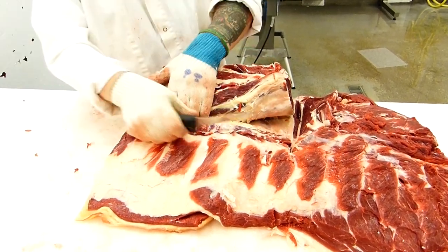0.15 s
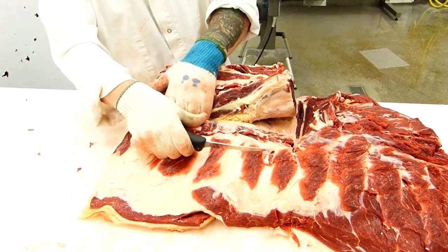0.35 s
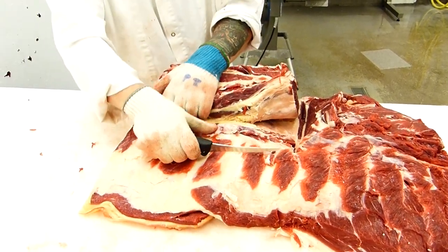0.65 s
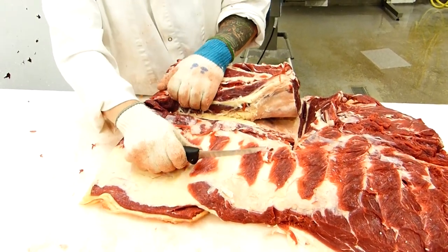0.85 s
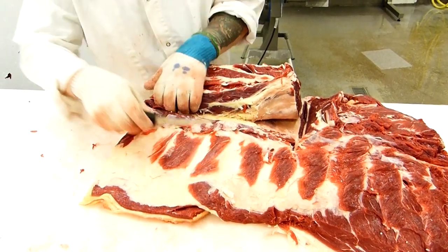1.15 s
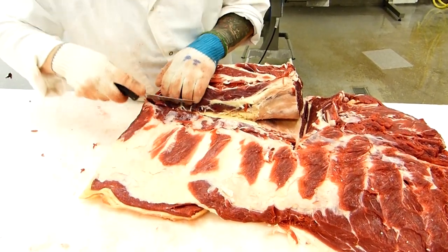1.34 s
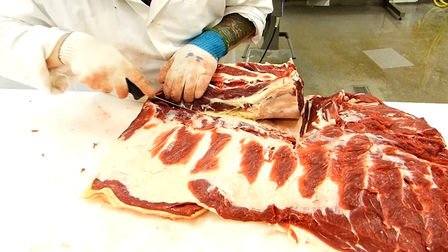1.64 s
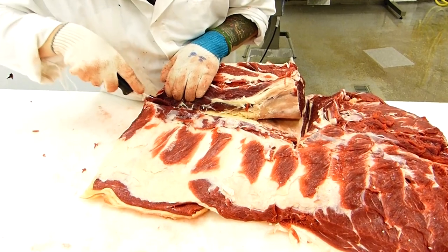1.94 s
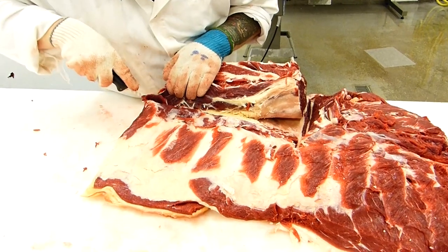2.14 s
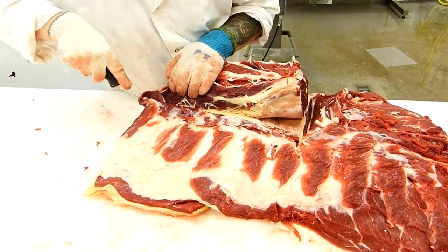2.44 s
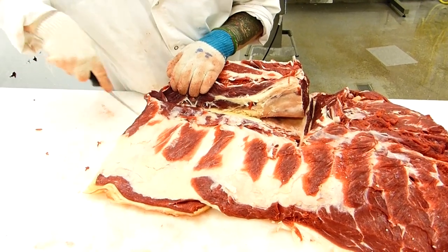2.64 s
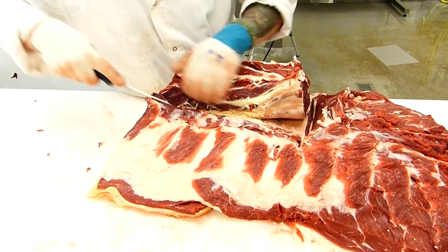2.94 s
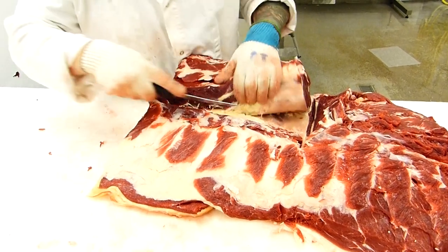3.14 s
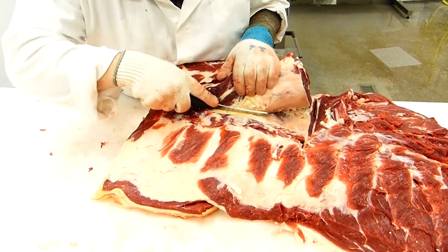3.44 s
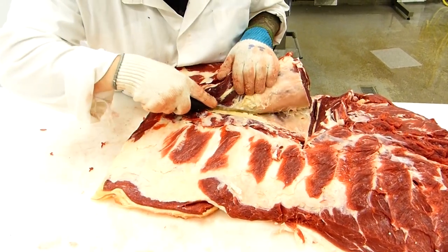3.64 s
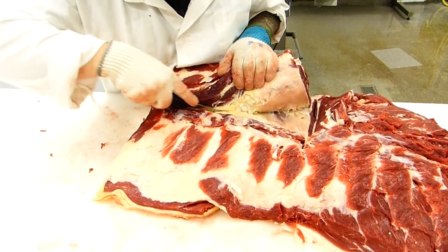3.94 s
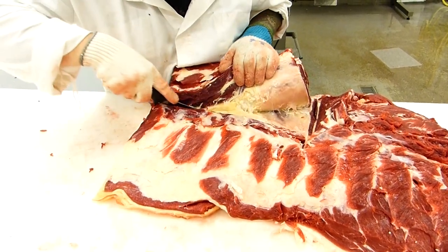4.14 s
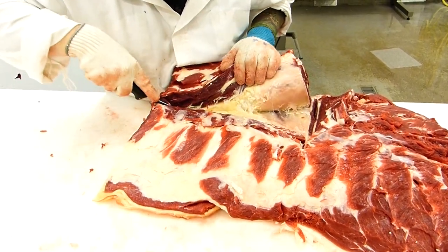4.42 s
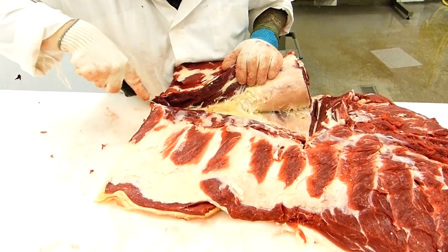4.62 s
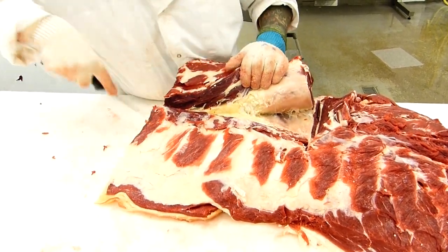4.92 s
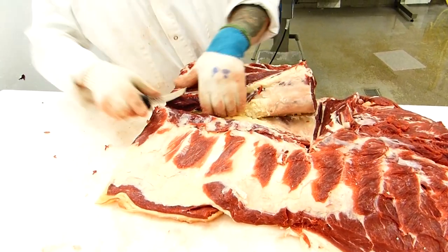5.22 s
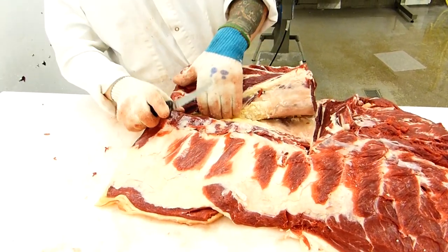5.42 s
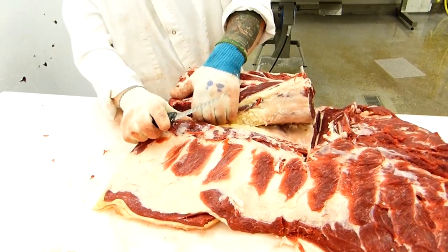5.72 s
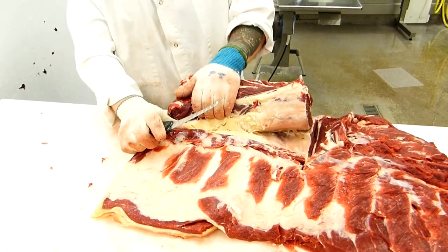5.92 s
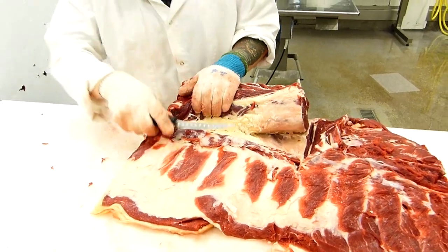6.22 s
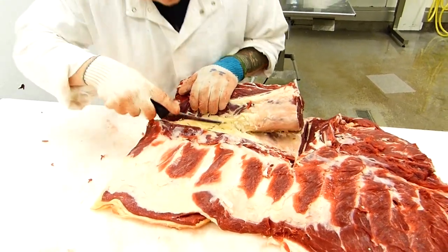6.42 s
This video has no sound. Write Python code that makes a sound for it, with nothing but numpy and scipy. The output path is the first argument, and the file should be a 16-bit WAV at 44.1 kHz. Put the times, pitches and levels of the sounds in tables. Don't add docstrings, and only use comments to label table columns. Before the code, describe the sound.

A cold, tiled cutting room hums throughout: a low wavering drone from two motors around 90 to 125 hertz, soft fan rumble, air rushing through a grille and a bright, slightly fluctuating hiss from a leaking air line, all wide in stereo. Close by, a faint bump at 0.4 s, then a few tiny clicks and a short tearing rasp with a small firm slap near 0.8. A light pat comes at 2.7. Crisp knife crackles burst at 3.1-3.4 and again around 3.85. At 4.9 a joint is slapped down, sharp, wet and very loud, with a roomy metallic tail. Soft settling and low table thuds follow at 5.0-5.4, then a faint rasp near 5.65 and the heaviest deep bump at 5.77, its low swing lingering. A faint blade drag at 6.2 and a light bump at 6.5 close it. The background dips briefly after loud touches.

```python
import sys
import numpy as np
from scipy import signal
from scipy.fft import rfft, irfft, next_fast_len
from scipy.io import wavfile
from scipy.ndimage import uniform_filter1d

SR = 44100
rng = np.random.default_rng(int(sys.argv[2]) if len(sys.argv) > 2 else 0)


def volts_from_db(level):
    exponent = np.asarray(level, float) / 20
    return 10 ** exponent


def wrap_up_sound(samples):
    columns = np.atleast_2d(samples).T
    tamed = np.clip(columns, -1, 1)
    steps = np.round(tamed * 32767).astype(np.int16)
    wavfile.write(sys.argv[1], SR, steps)


N = 289737

# f/Hz, density/dB per Hz
RUMBLE_SPECTRUM = [(6, 1), (12, -4.5), (24, 8), (35, -9.5), (54, 1), (72, -0.5), (82, -7), (108, 1),
                   (128, -13), (150, -10), (175, -11.5), (204, -17), (214, -13), (240, -26)]
RUSH_SPECTRUM = [(110, -1), (180, -2.5), (207, -4), (226, -14), (254, -8.5), (370, -9), (396, -11.5),
                 (429, -12), (450, -13.5), (582, -13.5), (1030, -11.5), (1900, -16.5), (2470, -45),
                 (4180, -120)]
GRILLE_SPECTRUM = [(1060, -34), (1800, -6), (2150, -6), (2440, -1.5), (2840, -2), (3240, -4), (3520, -4.5),
                   (3750, -5.5), (4400, -4), (5720, -15), (9680, -120)]
LEAK_SPECTRUM = [(2470, -36), (4200, -9), (5010, -6), (5630, 0), (6080, -3), (6680, 2), (7180, 0.5),
                 (8020, -1.5), (9060, 0.5), (10700, -12.5), (15700, -26.5)]
# f/Hz, width/Hz, lift/dB
DUCT_MODES = [(1044, 79, 3), (1780, 340, -6), (283, 120, -1), (2070, 50, 6.5), (2430, 150, 4),
              (2910, 37, 1.5), (3300, 81, -4), (3430, 130, 3), (4040, 60, 5.5), (4100, 59, -15),
              (4540, 53, 3.5), (3770, 670, -2), (4600, 50, -1), (5200, 55, -0.5), (6500, 59, 6),
              (6860, 120, 0), (7300, 82, 7), (9150, 150, 4), (12700, 250, 3), (13600, 120, 9),
              (15620, 150, 6)]
# f/Hz, level/dB rms, waver/dB
MOTOR_TONES = [(100.2, -36.5, 1.5), (123.3, -37.5, 0), (184, -39.5, 1.5), (200.6, -40.5, 0.6),
               (302.5, -56.5, 4), (398.7, -45, 0.5), (457.4, -51, -1.3), (548, -56, 4), (764, -53.0, 0),
               (15625, -56.5, 1.5)]
# f/Hz, left-right coherence/1, left-right level/dB, left lead/rad
MIC_PAIR = [(25, 1, 3, 0.74), (70, 0.98, 0, 0.76), (152, 0.89, 4, 0.69), (320, 0.43, 9, 0.43),
            (740, 0.46, 10, 0.37), (1800, 0.56, 8.5, -0.82), (4000, 0.57, 8.5, 0.068),
            (6500, 0.61, 4, -0.89), (7600, 0.64, 9, 0.8), (8300, -0.27, -1.5, 0.34),
            (9050, -0.46, 10, 0.25), (10800, -0.43, -3, .05), (12600, -0.81, 11, .05),
            (15500, -0.58, -5, 0.12)]
# t centre/s, width/s, lift/dB
LEANS = [(0.44, 0.079, 7.5), (0.9, 0.12, 4.5), (1.42, 0.06, 4.0), (2.32, 0.11, 4.0), (3.27, 0.074, 5.5),
         (4.4, 0.3, -0.5), (4.92, 0.038, 8), (5.09, 0.12, 9.0), (5.24, 0.07, 9.0), (5.52, 0.07, 8),
         (5.37, 0.04, 5), (6.2, 0.11, 5), (5.85, 0.21, 13.5), (6.55, 0.24, 7)]
# t centre/s, width/s, lift/dB
DRAUGHTS = [(0.24, 0.055, -9), (0.442, 0.096, -1.5), (4.87, 0.06, 6.5), (6.05, 0.12, -5)]
# t/s, pressure over mean/dB, brightness/dB
LEAK_CONTROL = [(0, 0, -1.5), (0.3, -1.5, -2), (0.65, 1.5, -0.7), (0.9, 1, 0.3), (1.1, 1.5, 0),
                (1.45, 0.5, 2.5), (1.7, -0.5, -1), (2.2, 2.2, -1.2), (2.5, 0.6, 0.3), (2.8, 0, 2.5),
                (3.1, 0.6, 0), (3.5, -0.1, 0), (4.6, -0.3, -1.1), (5.4, 2.5, 0.7), (6.1, -0.3, 0.5),
                (6.45, 0.7, 1.5), (6.57, 0, 2)]
# t/s, gain/dB
GAIN_CONTROL = [(0, -0.5), (0.4, 0.2), (0.8, 0), (1.7, 0.02), (3.15, 0.7), (3.3, -1), (3.83, -0.2),
                (3.93, -1.5), (4.85, -1.15), (4.97, 0.5), (5.35, -2.1), (5.75, -1.1), (5.85, -1), (6.1, -3),
                (6.45, -1.1), (6.57, -0.2)]
# t/s, top level/dB, frame level/dB
TABLE_BUMPS = [
    (.41, -35, -24),
    (5.214, -9, -34),
    (5.35, -12, -40),
    (5.6, -14.5, -41),
    (5.764, -6.5, -2),
    (5.782, -0.5, -35),
    (6.5, -22, -14),
]
# t/s, peak/dB, f/Hz
FIBRE_SNAPS = [(.679, -15, 2400), (.731, -17, 2600), (3.133, -10, 4000), (3.129, -14, 4000),
               (3.153, -8, 4500), (3.1605, -8, 4500), (3.1865, 1.5, 6200), (3.1865, -11, 3000),
               (3.2267, -6, 9000), (3.2342, -3, 7500), (3.2835, -15, 3500), (3.380, -23, 4000),
               (3.4012, -4, 6500), (3.445, -13, 6500), (3.8313, -6, 6000), (3.833, -8, 5500),
               (3.8395, -17, 5000), (3.8455, -8, 3300), (3.8563, -5, 3300), (3.857, -7, 3000),
               (3.85, -8, 5500), (3.861, -10, 4000), (3.8594, -7, 4500), (4.8986, -4, 3200),
               (4.901, -13, 2200), (4.9155, -7, 3800), (4.9152, -9, 8500), (5.648, -13, 3000)]
# t start/s, length/s, level/dB, f centre/Hz, click rate/(1/s)
BLADE_TEARS = [(0.765, 0.08, -35, 1500, 2600), (0.77, 0.087, -33, 600, 2000),
               (0.764, 0.086, -31.5, 4000, 3400), (3.13, 0.045, -33, 5000, 2300),
               (3.186, 0.052, -27, 4000, 3400), (3.82, 0.049, -24, 4180, 2700),
               (3.854, 0.010, -27, 2600, 5000), (3.84, 0.03, -36, 900, 3000), (4.98, 0.22, -35, 650, 900),
               (4.888, 0.012, -22, 5200, 6000), (5.617, 0.11, -43, 2500, 3300),
               (5.706, 0.088, -44, 416, 1400), (5.16, 0.07, -37, 350, 1800),
               (6.22, 0.16, -40.5, 1180, 3600)]
# t/s, peak/dB, body f/Hz, t60/s, room tail/dB
MEAT_SLAPS = [
    (.793, -10, 258, 0.017, -36),
    (2.689, -17, 446, 0.022, -43),
    (4.9153, 9, 490, 0.0064, -17),
    (5.04, -17, 334, 0.045, -34.5),
    (5.185, -21, 250, 0.11, -40),
    (5.222, -17, 140, 0.15, -50),
    (5.72, -22, 330, 0.04, -53),
    (5.752, -22, 456, 0.05, -44),
]
# f/Hz, width/Hz, level/dB
SHEET_MODES = [(75, 43, 6), (200, 100, 4.5), (340, 115, 3.5), (602, 91, 4), (880, 290, 3.5),
               (1310, 400, -6), (1800, 210, -0.5), (2800, 790, -4.5)]

RUMBLE_DB, RUSH_DB, GRILLE_DB, HISS_DB, BLADE_DB = -29.5, -32, -38.5, -26.5, -29
GRILLE_FOLLOWS_LEAK = 0.78
BLADE_HZ = 91.55
AIR_TOP_HZ, BRIGHT_FROM_HZ = 15740, 8300
TABLE_TOP_HZ, TABLE_TOP_T60_S, FRAME_HZ, FRAME_T60_S = 59.2, 0.24, 24.07, 1.83
TILES_T60_S, TILES_DB = 0.99, -15.5


def age(length_s):
    return np.arange(round(length_s * SR)) / SR


def add(out, t_s, piece):
    i = round(t_s * SR)
    out[..., i:i + piece.shape[-1]] += piece[..., :N - i]


def swell(centre_s, width_s):
    return np.exp(-((np.arange(N) / SR - centre_s) / width_s) ** 2)


def swells_db(rows):
    return sum(lift_db * swell(centre_s, width_s) for centre_s, width_s, lift_db in rows)


def curves(rows):
    t_s, *columns = np.transpose(rows)
    return [np.interp(np.arange(N) / SR, t_s, c) for c in columns]


def colour(points, hz):
    at_hz, *columns = np.transpose(points)
    return [np.interp(np.log(hz), np.log(at_hz), c) for c in columns]


def drift(rate_hz):
    r = np.exp(-80 * np.pi * rate_hz / SR)
    slow = signal.lfilter([1], [1, -2 * r, r * r], rng.standard_normal(N // 40 + 502))[500:]
    return np.interp(np.arange(N) / 40, np.arange(len(slow)), slow / slow.std())


def ring(hz, t60_s, length_s):
    t = age(length_s)
    return np.sin(2 * np.pi * hz * t) * volts_from_db(-60 * t / t60_s)


def band(x, low_hz, high_hz):
    edges_hz = [low_hz, min(high_hz, .45 * SR)]
    return signal.sosfilt(signal.butter(2, edges_hz, "band", fs=SR, output="sos"), x)


def air(spectrum, patchy_db, flicker_hz, count):
    size = next_fast_len(N)
    hz = np.maximum(np.arange(size // 2 + 1) * SR / size, 1)

    alike, tilt_db, lead_rad = colour(MIC_PAIR, hz)
    alike = np.clip(alike, -1, 1)
    first, second = rfft(rng.standard_normal((2, size)))
    left = first * volts_from_db(tilt_db / 2) * np.exp(1j * lead_rad)
    right = (alike * first + np.sqrt(1 - alike ** 2) * second) * volts_from_db(-tilt_db / 2)
    mid_power = (volts_from_db(tilt_db) + volts_from_db(-tilt_db) + 2 * alike * np.cos(lead_rad)) / 4

    level_db = colour(spectrum, hz)[0]
    for mode_hz, width_hz, lift_db in DUCT_MODES:
        level_db = level_db + lift_db / (1 + (2 * (hz - mode_hz) / width_hz) ** 2)
    standing = uniform_filter1d(rng.standard_normal(len(hz)), size=200)
    level_db = level_db + 0.98 * standing / standing.std() * (hz > 220)

    low_hz, high_hz = spectrum[0][0], spectrum[-1][0]
    inside = (hz > low_hz) & (hz < min(high_hz, AIR_TOP_HZ))
    pair = np.array([left, right]) * inside * volts_from_db(level_db) / np.sqrt(mid_power)
    place = np.log(hz / low_hz) / np.log(high_hz / low_hz) * (count - 1)
    out, together = 0, drift(flicker_hz / 2)
    for k in range(count):
        share = np.clip(1 - abs(place - k), 0, 1)
        flicker_db = patchy_db * (0.5 * together + drift(flicker_hz))
        out = out + irfft(pair * share, size)[:, :N] * volts_from_db(flicker_db)
    return out / out.mean(0).std()


def motors():
    t, out, side = np.arange(N) / SR, 0, np.array([[.5], [-.5]])
    tones = [(BLADE_HZ, BLADE_DB + swells_db(DRAUGHTS))]
    for hz, level_db, waver_db in MOTOR_TONES:
        tones.append((hz, level_db + waver_db * drift(2.4)))
    for hz, level_db in tones:
        _, tilt_db, lead_rad = colour(MIC_PAIR, hz)
        hunting_rad = 0.17 * drift(0.55)
        phase = 2 * np.pi * (hz * t + rng.random()) + hunting_rad + lead_rad * side
        out = out + np.sqrt(2) * np.sin(phase) * volts_from_db(level_db) * volts_from_db(tilt_db * side)
    return out


def fan_rumble():
    return volts_from_db(RUMBLE_DB + swells_db(LEANS)) * air(RUMBLE_SPECTRUM, patchy_db=1.0, flicker_hz=2.9, count=3)


def fan_rush(leak_db):
    duct = volts_from_db(RUSH_DB) * air(RUSH_SPECTRUM, patchy_db=0.16, flicker_hz=33.0, count=5)
    grille = air(GRILLE_SPECTRUM, patchy_db=0.23, flicker_hz=9.9, count=3)
    return duct + volts_from_db(GRILLE_DB + GRILLE_FOLLOWS_LEAK * leak_db) * grille


def brighten(x, lift_db):
    high_pass = signal.butter(4, BRIGHT_FROM_HZ, "high", fs=SR, output="sos")
    return x + (volts_from_db(lift_db) - 1) * signal.sosfiltfilt(high_pass, x)


def leak_hiss(leak_db, bright_db):
    jet = air(LEAK_SPECTRUM, patchy_db=0.7, flicker_hz=9.4, count=5)
    return volts_from_db(HISS_DB + leak_db) * brighten(jet, bright_db)


def table():
    out, push = np.zeros(N), np.hanning(int(0.017 * SR))
    for t_s, top_db, frame_db in TABLE_BUMPS:
        top = 1.64 * ring(TABLE_TOP_HZ, TABLE_TOP_T60_S, .4) + 0.83 * ring(110, .12, .4)
        add(out, t_s, volts_from_db(top_db) * top)
        add(out, t_s + 0.0371, volts_from_db(frame_db) * ring(FRAME_HZ, FRAME_T60_S, 1.2))
    return -signal.fftconvolve(out, push / push.sum())[:N]


def knife():
    out = np.zeros(N)
    for t_s, peak_db, hz in FIBRE_SNAPS:
        add(out, t_s, volts_from_db(peak_db + 1.0) * band(ring(hz, 7.8 / hz, .01), 1200, 12000))
    sizes = volts_from_db(3 * np.minimum(rng.exponential(1, N), 3)) * rng.choice([-1, 1], N)
    chance = rng.random(N)
    for t_s, length_s, level_db, hz, clicks_per_s in BLADE_TEARS:
        phase = age(length_s) / length_s
        start = round(t_s * SR)
        span = slice(start, start + len(phase))
        clicks = sizes[span] * (chance[span] < clicks_per_s / SR)
        swarm = band(clicks, hz / 1.64, hz * 1.76)
        envelope = np.sin(np.pi * phase ** 1.45) ** 0.22
        add(out, t_s, volts_from_db(level_db) * swarm / swarm.std() * envelope)
    return out


def tiles(x):
    t = age(0.93)
    envelope = volts_from_db(-60 * t / TILES_T60_S) * np.minimum(t / 0.013, 1)
    echoes = band(rng.standard_normal((2, len(t))), 940, 6000) * envelope
    echoes = echoes / np.sqrt((echoes ** 2).sum(1, keepdims=True))
    return volts_from_db(TILES_DB) * signal.fftconvolve(x[None], echoes, axes=1)[:, :N]


def slaps():
    near, far, t = np.zeros(N), np.zeros((2, N)), age(.8)
    for t_s, peak_db, hz, t60_s, tail_db in MEAT_SLAPS:
        white = rng.standard_normal((2, len(t)))
        body = volts_from_db(-1.5) * ring(hz, t60_s, .8)
        body += volts_from_db(-17) * ring(1.39 * hz, 0.75 * t60_s, .8)
        body += volts_from_db(-19) * ring(0.52 * hz, 2.2 * t60_s, .8)
        crack = band(white[0], 610, 3700) * volts_from_db(-6.5 - 60 * t / 0.023)
        add(near, t_s, volts_from_db(peak_db) * (body + crack))
        tail = 0
        for mode_hz, width_hz, mode_db in SHEET_MODES:
            mode = band(white, mode_hz - width_hz / 2, mode_hz + width_hz / 2)
            tail = tail + volts_from_db(mode_db) * mode / np.sqrt(width_hz)
        add(far, t_s, tail / tail.std() * volts_from_db(tail_db - 60 * t / 1.05) * np.minimum(t / 0.0053, 1))
    return band(near, 72, 3800), far


def stereo(x, left_db, right_db):
    return x * volts_from_db(np.array([[left_db], [right_db]]))


def scene():
    leak_db, bright_db = curves(LEAK_CONTROL)
    steady = motors() + fan_rumble() + fan_rush(leak_db) + leak_hiss(leak_db, bright_db)
    steady = steady * volts_from_db(curves(GAIN_CONTROL)[0])
    blade = knife()
    meat, tail = slaps()
    close = stereo(blade, 2.5, -3) + stereo(meat, 1.5, -1.8)
    far = stereo(tail + tiles(blade), 5, -2.5)
    return steady + table() + close + far


def roll_off(x):
    return signal.sosfilt(signal.butter(12, 16100, fs=SR, output="sos"), x)


def record(dry):
    t = np.arange(N) / SR
    over_db = np.maximum(20 * np.log10(abs(dry).max(0) + 1e-9) + 4.5, 0)
    held_db = np.maximum(np.maximum.accumulate(over_db + 30 * t) - 30 * t, 0)
    duck_db = signal.lfilter([.01], [1, -.99], held_db)
    mix = np.clip(dry * volts_from_db(-.6 * duck_db), -1, 1)
    return roll_off(mix)


dry = scene()
out = record(dry)
wrap_up_sound(out)
```